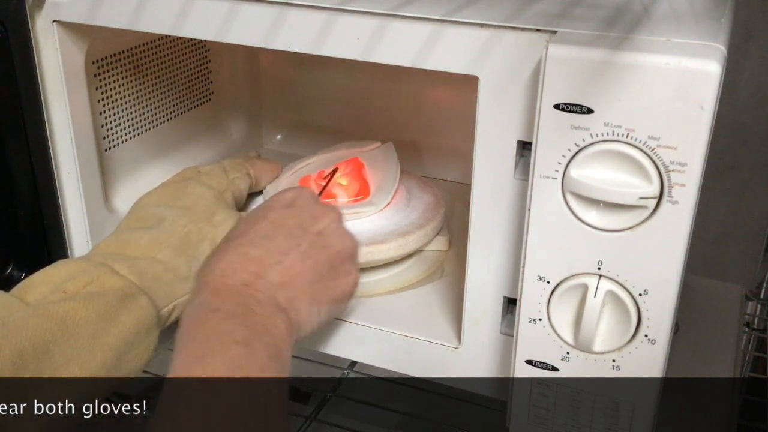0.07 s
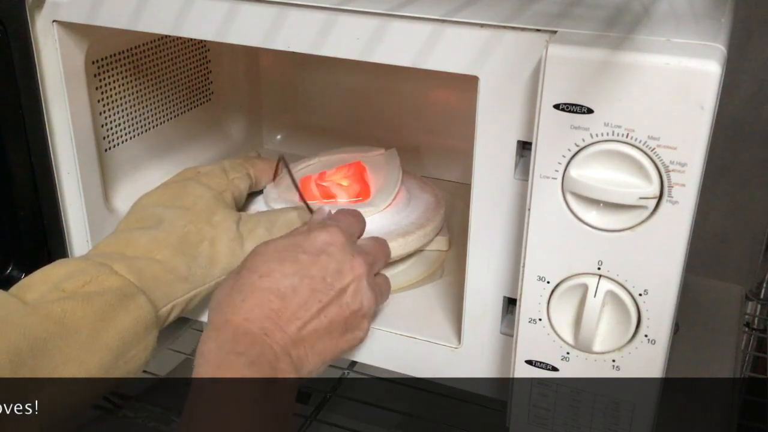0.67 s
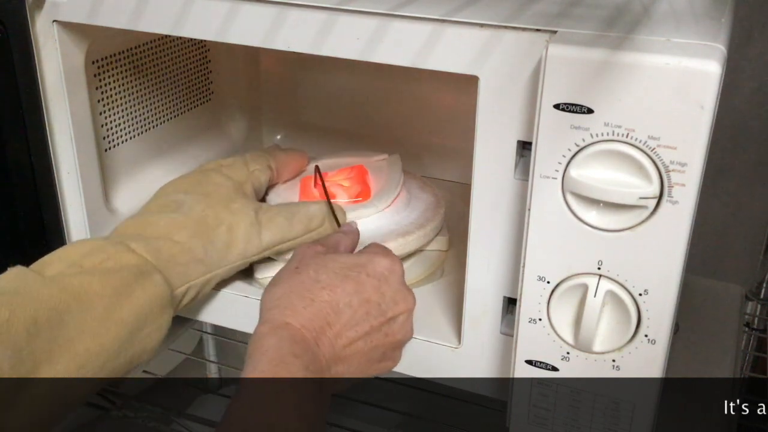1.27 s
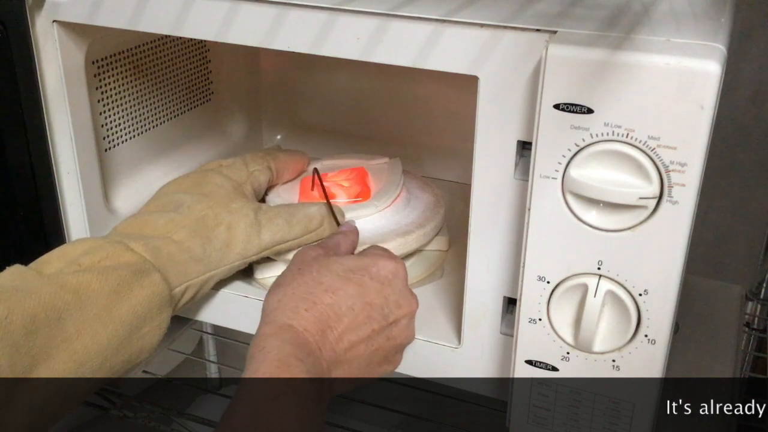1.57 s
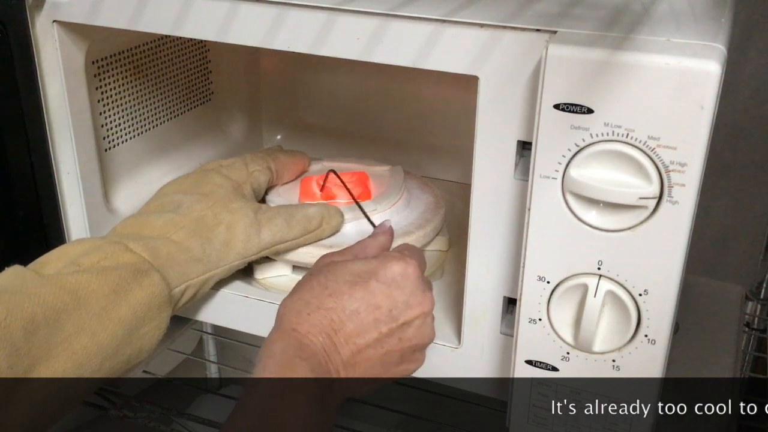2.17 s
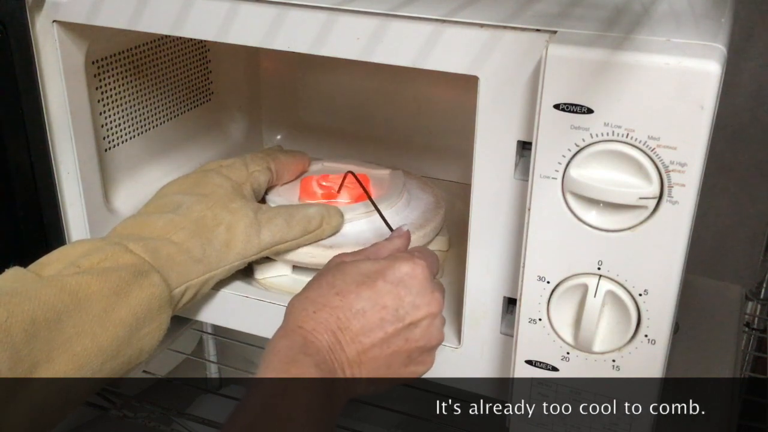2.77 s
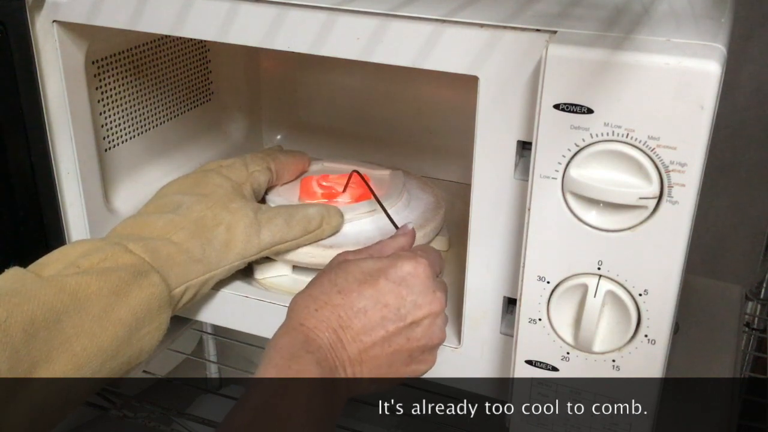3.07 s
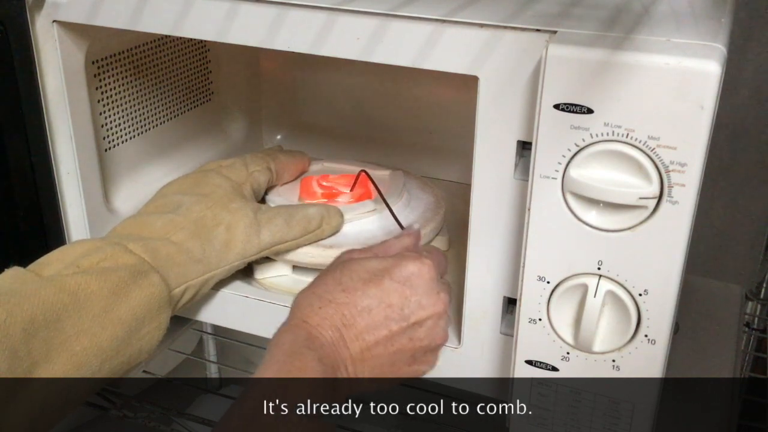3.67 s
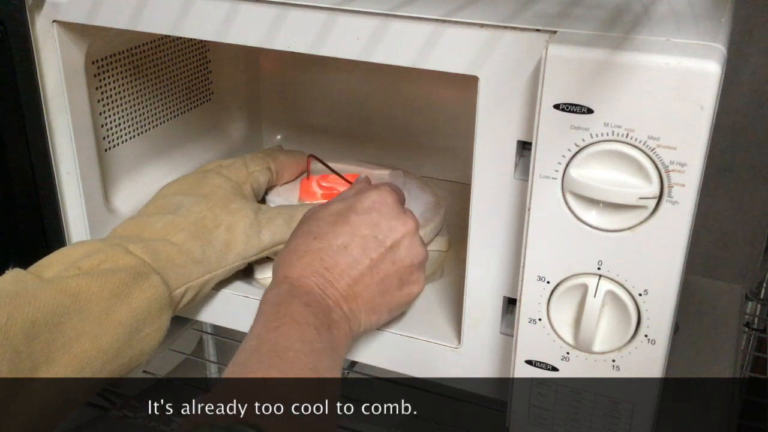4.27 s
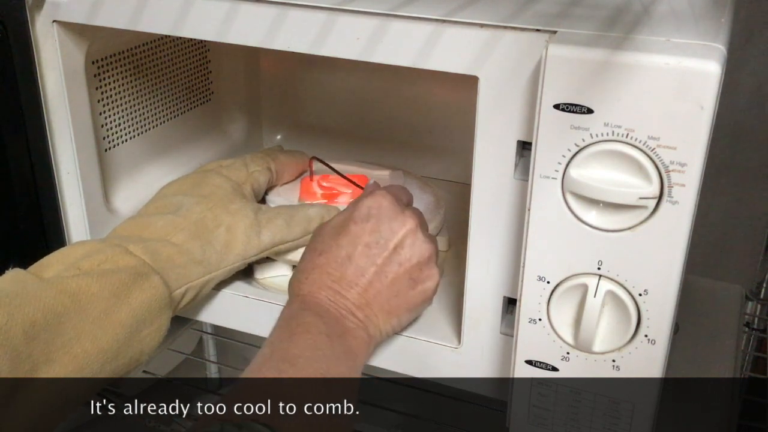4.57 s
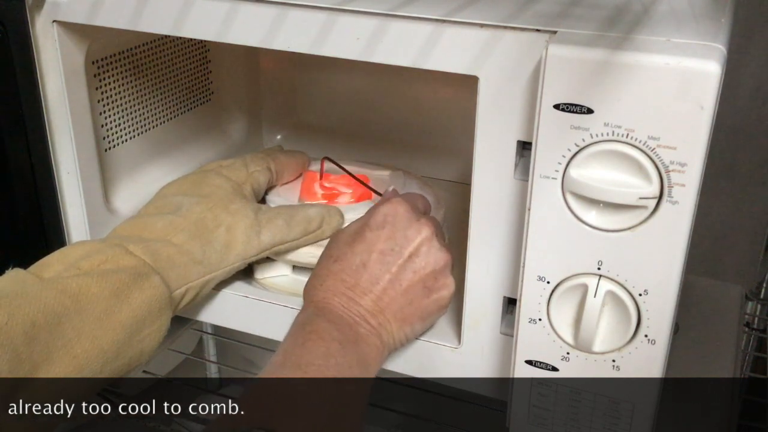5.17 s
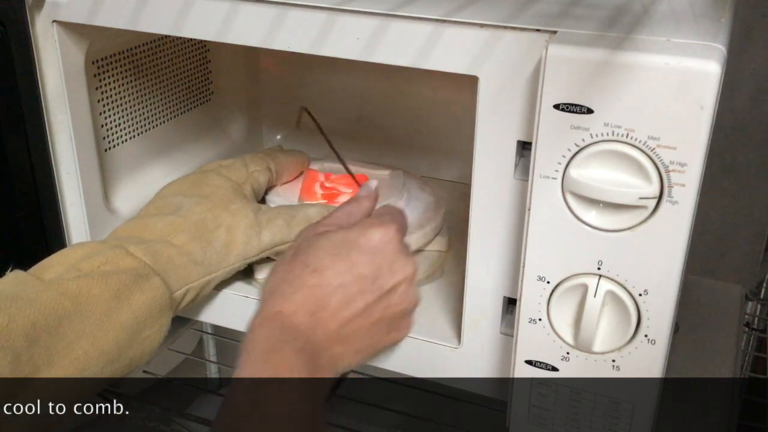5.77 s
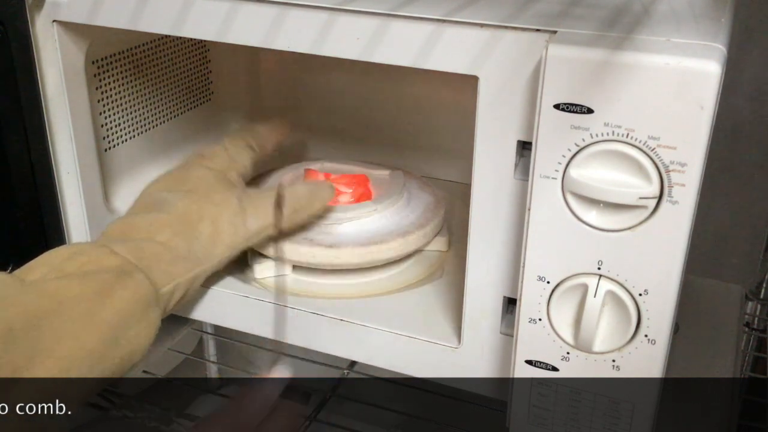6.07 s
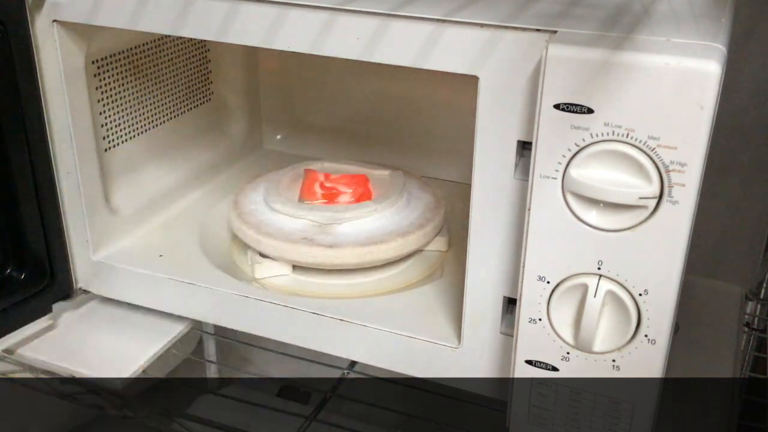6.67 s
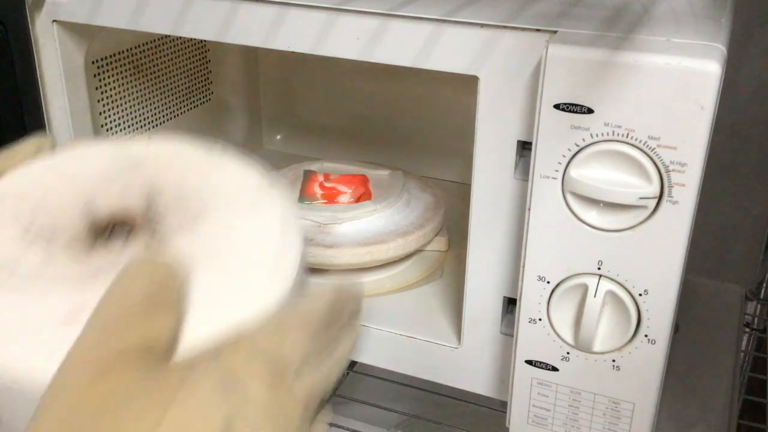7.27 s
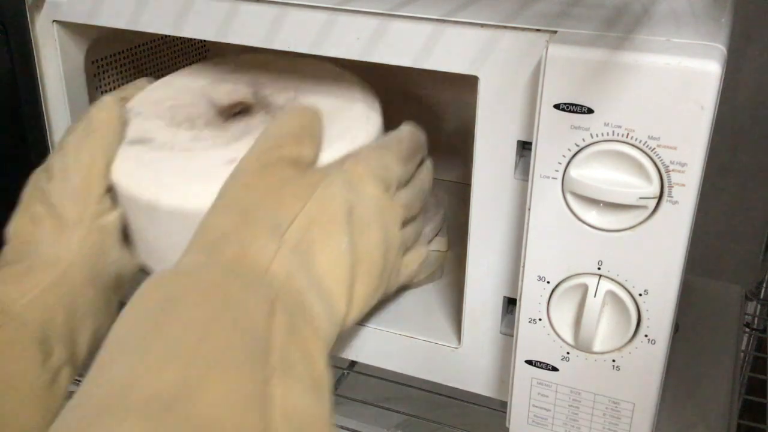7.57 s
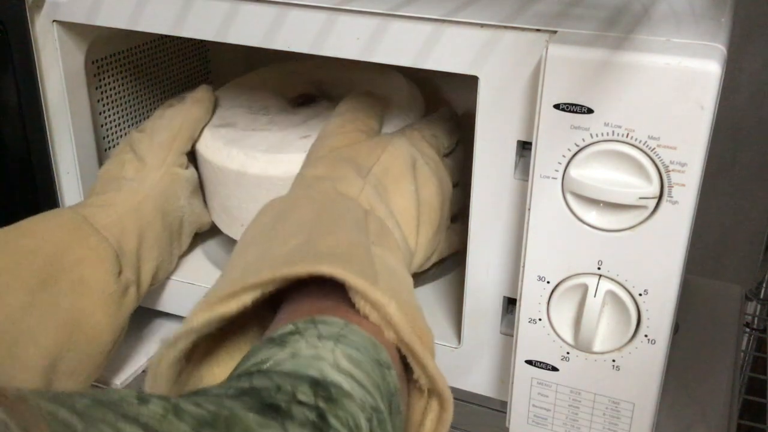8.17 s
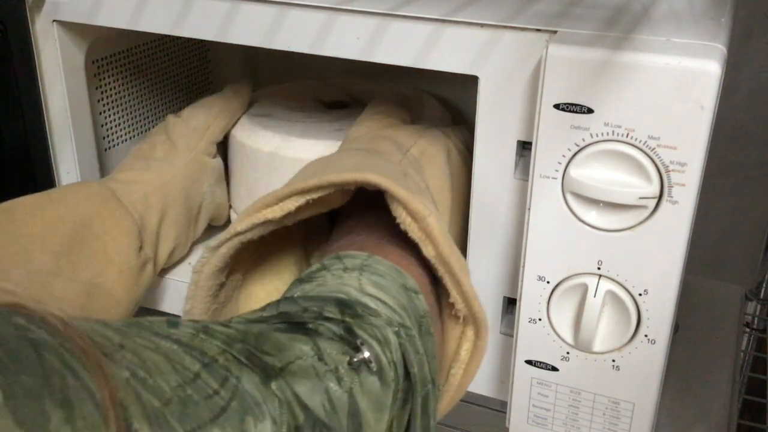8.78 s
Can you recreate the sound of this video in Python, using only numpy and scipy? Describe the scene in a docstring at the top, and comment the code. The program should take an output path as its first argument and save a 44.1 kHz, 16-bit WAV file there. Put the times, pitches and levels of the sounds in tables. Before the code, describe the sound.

Light metal taps and soft knocks inside a microwave oven, followed by a heavy ceramic lid rasping, landing with a clunk and being twisted.

```python
"""Hook and lid on a microwave kiln

Close up in a quiet workshop, a steel hook picks and drags at hot glass in a small ceramic kiln that
stands in an open microwave oven. Every push thumps the oven's hollow metal box; a leather glove rubs
as it steadies the kiln and lets go. The gritty ceramic lid is then dragged off its tile, set on the
kiln with a clunk and ground into place."""
import sys
import numpy as np
from scipy import signal
from scipy.fft import rfft, irfft, next_fast_len
from scipy.io import wavfile

SR = 44100
rng = np.random.default_rng(int(sys.argv[2]) if len(sys.argv) > 2 else 0)


def store_pcm(level_fs):
    """Save levels as 16-bit WAV."""
    pcm = np.round(np.clip(level_fs, -1, 1) * 32767).astype(np.int16)
    wavfile.write(sys.argv[1], SR, np.atleast_2d(pcm).T)


N = 389844
T = np.arange(N) / SR
RING_T = T[:SR // 2]  # time axis of one blow


def undb(db):
    """Decibels to gain."""
    return 10 ** (np.asarray(db) / 20)


def unit(x):
    """Scale to rms 1."""
    return x / np.sqrt(np.mean(x ** 2))


def add(out, s, sound):
    """Mix a sound in at time s."""
    i = int(s * SR)
    out[i:i + len(sound)] += sound[:N - i]


def colour(x, points):
    """Filter by a spectrum of (f/Hz, level/dB) points."""
    hz, db = np.transpose(points)
    size = next_fast_len(len(x))
    f = np.maximum(np.fft.rfftfreq(size, 1 / SR), 1)
    gain = undb(np.interp(np.log(f), np.log(hz), db))
    return irfft(rfft(x, size) * gain, size)[:len(x)]


def tilt(points, db_per_octave):
    """A spectrum tipped about the middle of the treble."""
    return [(hz, db + db_per_octave * np.log2(hz / 3000)) for hz, db in points]


def cut(x, hz, kind, order):
    """Low-pass or high-pass."""
    return signal.sosfilt(signal.butter(order, min(hz, SR / 4), kind, fs=SR, output="sos"), x)


def fade(t60):
    """Exponential decay, 60 dB in t60 seconds."""
    return np.exp(-np.log(1000) * RING_T / t60)


def ring(modes):
    """Free ringing of (f/Hz, level/dB, t60/s) modes after a blow."""
    return sum(undb(db) * fade(t60) * np.cos(2 * np.pi * hz * RING_T) for hz, db, t60 in modes)


def resonate(x, hz, width_hz):
    """One resonance; white noise comes out at its own level."""
    radius = np.exp(-np.pi * width_hz / SR)
    turn = radius * np.cos(2 * np.pi * hz / SR)
    rung = signal.lfilter([1, -turn], [1, -2 * turn, radius ** 2], x + 1e-18)
    return np.sqrt(2 * (1 - radius ** 2)) * rung


def cavity(x, t60, wet_db):
    """Dense reflections between the oven's steel walls."""
    echo = rng.standard_normal(len(RING_T)) * fade(t60)
    echo *= undb(wet_db) / np.sqrt(np.sum(echo ** 2))
    echo[0] += 1  # direct sound
    return signal.fftconvolve(x, echo)[:N] / np.sqrt(np.sum(echo ** 2))


def wander(per_s):
    """Random drift that takes a new value so many times a second."""
    return np.interp(T * per_s, np.arange(2000), rng.standard_normal(2000))


def grit(spread_db, judder_hz, judder_db):
    """Dense micro-slips of uneven size; the contact catches and frees at random."""
    slips = rng.standard_normal(N) * undb(spread_db * rng.standard_normal(N))
    return unit(slips * undb(judder_db * wander(judder_hz)))


def strokes(rows, release_db_per_s, level_column=3):
    """Gain of friction strokes that press in, hold, then let go at a rate set by the material."""
    power = np.zeros(N)
    t = T[:2 * SR]
    for row in rows:
        start, attack, hold = row[:3]
        released_db = release_db_per_s * np.maximum(t - attack - hold, 0)
        gain = np.minimum(t / attack, 1) * undb(row[level_column] - released_db)
        add(power, start, gain ** 2)
    return np.sqrt(power)


def ring_share(rows):
    """How strongly the lid rings, passing smoothly from one stroke to the next."""
    start, attack, hold, _, ring_db = np.transpose(rows)[:5]
    return undb(np.interp(T, start + attack + hold / 2, ring_db))


def scrape(slips, force, spectrum, resonances, ringing, t60, wet_db, wander_db):
    """Slips hiss into the oven and ring the scraped part; the shifting contact favours modes in turn."""
    force = force / np.sqrt(1 + ringing ** 2)  # hiss and ringing share the power
    drive = slips * force * ringing
    weights = np.array([undb(db) * np.sqrt(width) for _, width, db in resonances])
    rung = np.zeros(N)
    for weight, (hz, width, _) in zip(weights / np.linalg.norm(weights), resonances):
        contact = unit(undb(wander_db * wander(per_s=16)))
        rung += weight * resonate(drive * contact, hz, width)
    hiss = unit(colour(slips, spectrum)) * force
    return cavity(hiss, t60, wet_db) + rung


def breakaway(slips, rows, spectrum, gain_db, tilt_db, snap_s=0.012):
    """As a stroke breaks loose it crunches brightly; the more sudden its start, the stronger."""
    snaps = [(start, attack, 0, db + gain_db - 20 * np.log10(1 + attack / snap_s))
             for start, attack, _, db, *_ in rows]
    return unit(colour(slips, tilt(spectrum, tilt_db))) * strokes(snaps, release_db_per_s=250)


def room_tone(level_db=-64):
    """Low murmur of a quiet workshop under an even hiss."""
    # workshop air: f/Hz, level/dB
    spectrum = [(25, -0.5), (40, -4.5), (62, -0.5), (100, 1), (150, -2.5), (240, -1), (330, -6.5),
                (500, -15), (900, -22), (2000, -25), (5000, -29.5), (9000, -32.5), (16000, -37)]
    return unit(colour(rng.standard_normal(N), spectrum)) * undb(level_db)


def glove():
    """Leather gives a soft, low rub on the kiln and the oven wall."""
    # rubs: t/s, attack/s, hold/s, level/dB
    rubs = [(.79, 0.027, 0.083, -64), (.95, .12, 0.025, -63), (1.11, 0.026, .015, -58),
            (1.18, 0.016, 0.1, -67), (6.0, 0.037, 0.0045, -59), (6.08, 0.037, 0.19, -71.5),
            (6.24, 0.073, 0.1, -56.5), (6.55, 0.097, .14, -64)]
    # leather friction: f/Hz, level/dB
    leather = [(100, -22), (300, 4), (600, 0.5), (950, -3.5), (1400, -7.5), (2200, -18), (5000, -20.5),
               (16000, -33)]
    slips = grit(spread_db=11.5, judder_hz=69.4, judder_db=-0.5)
    rub = unit(colour(slips, leather)) * strokes(rubs, release_db_per_s=190)
    return cavity(rub, t60=0.07, wet_db=-1)


def stick_slip(groan_q=2.94):
    """Each catch of hook or lid swells one narrow, rough resonance and lets it die away."""
    # the oven box groans: middle t/s, f/Hz, level/dB, length/s
    groans = [(0.276, 264, -51.5, 0.041), (1.252, 241, -53, 0.048), (2.261, 260, -50.5, 0.032),
              (2.401, 207, -55.5, .065), (3.077, 200, -61, 0.12), (4.355, 243, -55, 0.04),
              (4.979, 242, -49.5, 0.046), (5.723, 267, -50, 0.038), (5.81, 120, -53, 0.12),
              (8.39, 203, -40.5, 0.055)]
    # hook or lid locks on and squeaks or hums: middle t/s, f/Hz, width/Hz, level/dB, length/s
    squeaks = [(0.482, 3220, 410, -75, .033), (0.638, 5430, 450, -65, .021),
               (.652, 1640, 250, -65.5, 0.025), (3.849, 2190, 150, -71.5, .025),
               (4.97, 740, 250, -63.5, 0.043), (5.299, 3080, 750, -80, 0.44), (6.96, 687, 22, -56.5, 0.021),
               (6.956, 2260, 23, -53, .047), (7.046, 2536, 11, -39, 0.021), (7.168, 2765, 73, -41, 0.086),
               (7.175, 1790, 25, -49.5, .05), (7.28, 1777, 16, -47.5, 0.021),
               (8.228, 1516, 4.1, -43, 0.051), (8.48, 129.5, 6.3, -44.5, .1), (8.557, 1723, 8, -52, 0.053)]
    catches = [(s, hz, hz / groan_q, db, length) for s, hz, db, length in groans] + squeaks
    out = np.zeros(N)
    t = T[:SR] - .5
    f = np.fft.rfftfreq(SR, 1 / SR)
    for s, hz, width_hz, db, length in catches:
        peak = 1 / (1 + (2 * (f - hz) / width_hz) ** 2)
        swell = np.exp(-2 * (t / length) ** 2)
        tone = irfft(rfft(rng.standard_normal(SR)) * peak, SR) * swell
        tone *= undb(db) * np.linalg.norm(swell) / np.linalg.norm(tone)
        start = int((s - .5) * SR)
        add(out, max(start, 0) / SR, tone[max(-start, 0):])
    return out


def hook_drags(release_db_per_s=360, sing_db=-11):
    """The hook scratches and sings, then squeaks thinly through the stiff glass."""
    # scratches at the glass: t/s, attack/s, hold/s, level/dB, tilt/(dB per octave)
    scratches = [(0.231, 0.033, .004, -66, -2), (0.428, 0.044, 0.059, -66.5, 4.5),
                 (0.63, .005, 0.02, -65.5, -0.5), (0.751, 0.025, 0.0054, -63, 0),
                 (0.803, 0.045, 0.062, -67, -1.5), (0.916, 0.036, 0.14, -71.5, 2),
                 (1.143, 0.11, 0.064, -67.5, -2), (1.334, 0.034, 0.13, -73.5, -3),
                 (1.638, 0.075, .16, -74, -1), (2.19, 0.032, 0.063, -72, -2.5),
                 (5.701, 0.012, 0.034, -64, -2.5)]
    # slow pulls through the glass: t/s, attack/s, hold/s, level/dB
    pulls = [(4.65, 0.33, .03, -72.5), (5.08, 0.12, 0.27, -81.5)]
    # friction of steel on glass: f/Hz, level/dB
    friction = [(600, -4), (1500, 0), (2200, 2.5), (4000, -6), (5300, -1), (6500, -9.5), (10000, -8),
                (14000, -15), (16000, -9.5)]
    # resonances of the dragged hook: f/Hz, width/Hz, level/dB
    modes = [(2170, 100, 2), (3050, 460, -6), (4400, 800, 5), (5150, 420, 5)]
    slips = grit(spread_db=5.5, judder_hz=59.1, judder_db=3)
    scratch = sum(unit(colour(slips, tilt(friction, row[4]))) * strokes([row], release_db_per_s)
                  for row in scratches)
    sing = undb(sing_db) * resonate(slips * strokes(scratches, release_db_per_s), hz=2160, width_hz=110)
    force = strokes(pulls, release_db_per_s=37)
    pull = scrape(slips, force, friction, modes, ringing=1, t60=.06, wet_db=4, wander_db=-1.5)
    return cavity(scratch, t60=0.07, wet_db=-1) + sing + pull


def ticks(crack_db=-1, tail_db=-24, ring_db=-8.5, ring_growth=0.24, scatter_db=1):
    """A bright crack with a brief, varying ring of hook and glass; only the firm ticks ring much."""
    # ticks of steel, glass and grit: t/s, level/dB, tilt/(dB per octave)
    hits = [(.277, -58.5, 6), (0.635, -61, 7), (0.791, -51.5, -3), (0.88, -61, -10), (1.580, -53, -3.5),
            (1.745, -63, 2), (2.718, -49.5, 0), (2.963, -50, -1.5), (3.521, -47.5, -0.5),
            (3.561, -56, -3.5), (3.803, -58.5, -4.5), (4.2, -60, -6.5), (5.682, -63, 0), (5.798, -63, -1),
            (5.850, -64.5, -0.5), (6.030, -58, 8), (6.16, -59.5, -1), (6.37, -60, -1), (7.77, -55, -14),
            (7.854, -57, -13), (8.132, -42, -0.5)]
    # modes of the hook on glass: f/Hz, level/dB, t60/s
    modes = [(712, -10, .12), (830, -12, .08), (1230, -12, .08), (1640, 3, .07), (1718, 3, .07),
             (2090, 0, .09), (2840, -6, .05), (5080, 0, .045), (5240, 1, .045)]
    # the crack: f/Hz, level/dB
    spectrum = [(300, -11), (900, 2.5), (1600, 9.5), (3500, 5.5), (5300, 3.5), (7000, -1.5), (9500, 0.5),
                (16000, -11)]
    out = np.zeros(N)
    firmest_db = max(db for _, db, _ in hits)
    decay = fade(t60=0.04) + undb(tail_db) * fade(t60=0.31)
    for s, db, tilt_db in hits:
        hook = ring([(hz, level + scatter_db * rng.standard_normal(), t60) for hz, level, t60 in modes])
        hook *= undb(ring_db + ring_growth * (db - firmest_db))
        crack = unit(colour(rng.standard_normal(len(RING_T)), tilt(spectrum, tilt_db))) * decay
        add(out, s, undb(db) * (undb(crack_db) * crack + hook))
    return out


def blow(thump_db, clack_db, push_s, spot_hz, build_s=0.0023, contact_s=0.0007):
    """A push thumps the box; hard contact adds a short ceramic clack that echoes inside the oven."""
    # modes of the oven box under the kiln: f/Hz, level/dB, t60/s
    box_modes = [(76, -27, 0.69), (104.8, -33.5, 1), (133.6, -12, 0.4), (184.2, -16.5, 0.19),
                 (205, -2.5, 0.068), (220.6, -6.5, 0.2), (250.1, -0.5, 0.26), (261, 0.5, 0.19),
                 (351.6, -1.5, 0.25), (414.5, -15, 0.33), (711, -21.5, 0.97)]
    # ceramic clack: f/Hz, level/dB
    spectrum = [(40, -36), (80, -16), (200, 7), (350, 6), (500, -5.5), (680, 1.5), (850, -2.5), (1100, -4),
                (1600, -5), (2500, -3.5), (5000, -15), (16000, 10)]

    def favour(hz, boost_db=4, octaves=0.28):
        """The point of contact lifts the pitches near spot_hz."""
        return boost_db * np.exp(-(np.log2(hz / spot_hz) / octaves) ** 2)

    box = ring([(hz, db + favour(hz), t60) for hz, db, t60 in box_modes])
    box *= 1 - np.exp(-RING_T / build_s)  # the panels take a cycle or so to get moving
    push = RING_T * np.exp(-2 * np.pi * RING_T / push_s)  # a longer push is duller
    thump = signal.fftconvolve(box, push / push.sum())[:len(RING_T)]
    clack = colour(rng.standard_normal(len(RING_T)), [(hz, db + favour(hz)) for hz, db in spectrum])
    clack = unit(cut(clack, 1.98 / push_s, "low", order=4))  # a short push is bright
    clack *= 1 - np.exp(-RING_T / contact_s)
    tail = cut(clack, 700, "low", order=1) * fade(t60=0.61) * undb(-16)  # the lows stay longest
    return undb(thump_db) * thump + undb(clack_db - 5) * (clack * fade(t60=0.12) + tail)


def knocks(rock_s=.016, rock_db=-15, rock_clack_db=-9, rock_softer=1.36):
    """Each push tips the kiln, which rocks back once: weaker, with a longer contact and less clack."""
    # pushes on the kiln: t/s, thump level/dB, clack level/dB, push length/s, favoured f/Hz
    pushes = [(0.513, -33.5, -73, 0.0068, 156), (0.66, -53.5, -61, 0.0026, 336),
              (.789, -46, -33.5, .001, 786), (1.325, -45.5, -45, 0.0041, 217),
              (1.584, -46.5, -53, 0.0033, 244), (1.714, -47.5, -46, 0.0017, 360),
              (2.224, -50.5, -54, 0.0017, 208), (2.283, -47.5, -46.5, 0.0036, 188),
              (2.734, -61.5, -53.5, 0.0027, 212), (3.0012, -52.5, -47, .0024, 192),
              (3.508, -49.5, -62, 0.003, 239), (3.803, -39.5, -40, 0.0024, 250),
              (4.204, -42.5, -45.5, 0.0037, 214), (5.687, -62, -55, 0.0016, 900),
              (5.749, -41, -31, 0.00095, 486), (6.054, -46, -76, 0.0022, 260),
              (6.161, -70, -56.5, 0.0011, 605), (6.445, -57, -50.5, 0.0025, 650),
              (8.644, -44, -55, 0.0033, 250), (8.675, -57, -32, 0.0021, 850),
              (8.69, -36.5, -33, 0.0016, 260), (8.718, -41, -30, 0.0014, 250),
              (8.727, -34.5, -22, 0.0019, 650)]
    out = np.zeros(N)
    for s, thump_db, clack_db, push_s, spot_hz in pushes:
        add(out, s, blow(thump_db, clack_db, push_s, spot_hz))
        rock = blow(thump_db, clack_db + rock_clack_db, push_s * rock_softer, spot_hz)
        add(out, s + rock_s, undb(rock_db) * rock)
    return out


def lid_lifted():
    """Gloves first brush the gritty face of the lid as they feel for it; then the porous lid is gripped and
    rasps off its tile into the oven."""
    # slides (the faint first ones are gloves brushing the lid before it is gripped): t/s, attack/s, hold/s,
    # level/dB, ringing over hiss/dB
    slides = [(6.135, 0.049, 0.36, -71, -28), (6.474, 0.094, 0.29, -64, -3), (6.811, 0.029, 0.003, -38, 4),
              (6.915, 0.014, 0.029, -47, 2), (6.994, 0.013, .005, -46.5, -6),
              (7.02, 0.02, 0.0045, -38.5, 0.5), (7.057, 0.072, 0.1, -42, 9.5),
              (7.245, 0.023, 0.021, -45.5, 5), (7.31, 0.13, .015, -46.5, -5.5),
              (7.485, 0.017, 0.032, -51.5, -4.5), (7.569, 0.018, 0.027, -52.5, -2),
              (7.739, 0.02, 0.028, -61, -23), (7.832, 0.02, 0.019, -61, 4), (7.92, 0.025, 0.03, -64.5, 0)]
    # friction of lid on tile: f/Hz, level/dB
    friction = [(200, 3), (400, -3.5), (700, 4.5), (1100, -4.5), (1600, 4.5), (2600, -1.5), (3800, 2.5),
                (4600, 3.5), (5300, -2.5), (6300, -4), (9000, -3), (11500, -9.5), (16000, -11)]
    # resonances of the sliding lid: f/Hz, width/Hz, level/dB
    modes = [(700, 30, -14), (1350, 45, -11), (1535, 23, -9), (1797, 22, 0), (2073, 22, -6), (2127, 20, -5),
             (2254, 30, -6), (2525, 24, 1), (2597, 20, -5), (2746, 26, -.5), (2784, 20, -.5),
             (2960, 50, -8), (3238, 18, -4), (3441, 20, -4), (3760, 45, -8), (4300, 40, -9),
             (5100, 250, -11), (5450, 150, -12)]
    slips = grit(spread_db=5, judder_hz=156.4, judder_db=-0.5)
    force = strokes(slides, release_db_per_s=175)
    rasp = scrape(slips, force, friction, modes, ring_share(slides), t60=0.047, wet_db=-1.5, wander_db=3)
    grains = grit(spread_db=13, judder_hz=160, judder_db=4)
    return rasp + breakaway(grains, slides, friction, gain_db=4.5, tilt_db=6)


def lid_landing(rim_s=8.129, flat_s=8.1378, bounce_s=.01175, bounce_db=-7, bounce_softer=1.5):
    """The rim touches, then the lid drops flat and chatters, each bounce weaker and softer."""
    push_s, spot_hz = 0.00078, 279
    out = np.zeros(N)
    add(out, rim_s, blow(thump_db=-32.5, clack_db=-30.5, push_s=push_s, spot_hz=spot_hz))
    for k in range(3):
        clunk = blow(thump_db=-21.5, clack_db=-20, push_s=push_s * bounce_softer ** k, spot_hz=spot_hz)
        add(out, flat_s + k * bounce_s, undb(k * bounce_db) * clunk)
    return out


def lid_seated():
    """The lid is twisted to and fro on the kiln, rasping and shaking the box beneath."""
    # twists: t/s, attack/s, hold/s, grit level/dB, ringing over hiss/dB, rumble level/dB
    twists = [(8.128, 0.0049, .008, -47, -13, -37), (8.167, 0.01, 0.07, -41.5, 1, -33),
              (8.287, 0.009, .005, -49.5, -1, -46), (8.31, 0.061, 0.033, -40, 5, -37.5),
              (8.453, 0.006, 0.011, -48, 2, -44), (8.523, 0.0095, 0.05, -49, -4, -44.5),
              (8.633, 0.0096, 0.067, -47, -4, -41), (8.757, 0.0063, 0.024, -56, -7, -63)]
    # friction of lid on kiln: f/Hz, level/dB
    friction = [(300, -22), (600, 7), (1000, 1.5), (1800, 3.5), (3000, -0.5), (4200, -1.5), (5400, -3),
                (7000, -9.5), (9000, -12.5), (12000, -17.5), (16000, -14)]
    # resonances of the seated lid: f/Hz, width/Hz, level/dB
    modes = [(500, 15, -9), (698, 16, 0), (742, 20, -6), (1285, 40, -6), (1539, 12, 3), (1600, 45, -5),
             (1720, 16, 1), (1850, 27, -9), (2070, 40, -8), (2266, 20, -6), (2586, 22, -4), (2810, 30, -6),
             (3074, 35, -4), (3380, 30, -10)]
    # the shaken oven box: f/Hz, level/dB
    box_spectrum = [(40, -16), (80, -8), (112, -6), (133, 2), (152, -12), (182, -3), (215, -0.5), (252, 13),
                    (300, -5), (360, -2), (420, -9), (500, -26), (900, -48)]
    slips = grit(spread_db=4.5, judder_hz=113.3, judder_db=2.2)
    force = strokes(twists, release_db_per_s=335)
    rasp = scrape(slips, force, friction, modes, ring_share(twists), t60=0.08, wet_db=4.5, wander_db=2.5)
    grains = grit(spread_db=4, judder_hz=158, judder_db=3)
    crunch = breakaway(grains, twists, friction, gain_db=-4, tilt_db=2)
    shake = strokes(twists, release_db_per_s=120, level_column=5)
    rumble = unit(colour(rng.standard_normal(N), box_spectrum)) * shake
    return rasp + crunch + rumble


def scene():
    """All sources in mono, at one microphone close to the open oven."""
    handling = knocks() + ticks() + stick_slip() + hook_drags() + glove()
    lid = lid_lifted() + lid_landing() + lid_seated()
    return (room_tone() + handling + lid)[None]


def record(dry, bass_hz=54, top_hz=15900):
    """The small microphone loses the deep bass and the recorder cuts the top."""
    thin = cut(dry, bass_hz, "high", order=4)
    return signal.sosfilt(signal.ellip(10, .2, 70, top_hz, fs=SR, output="sos"), thin)


dry = scene()
out = record(dry)
store_pcm(out)
```